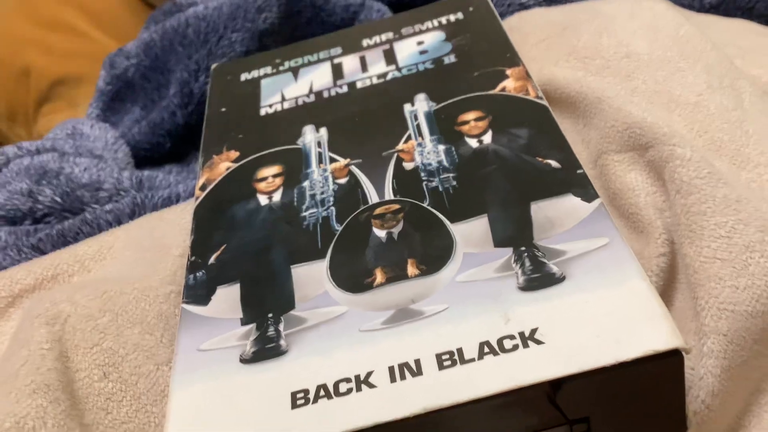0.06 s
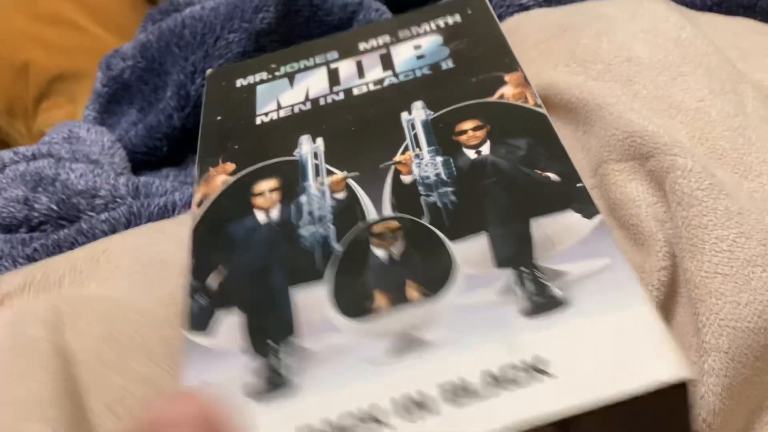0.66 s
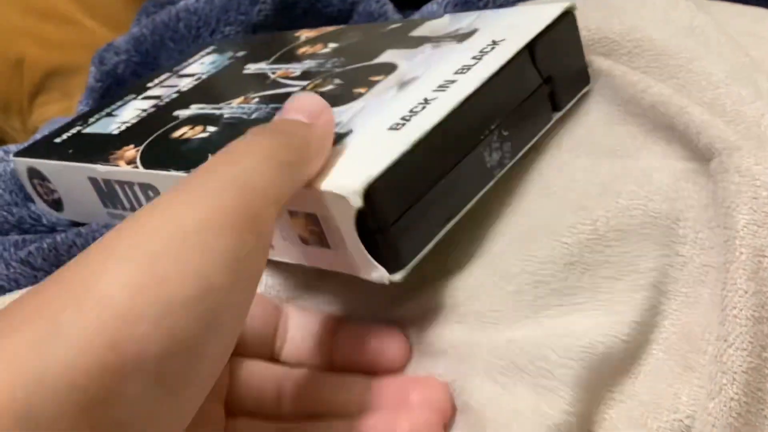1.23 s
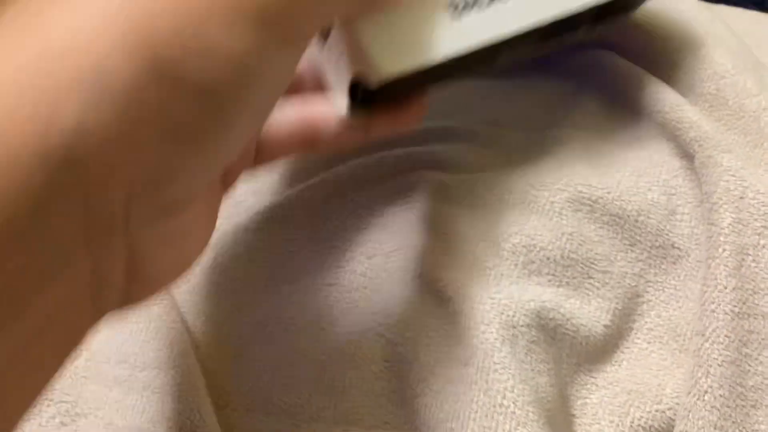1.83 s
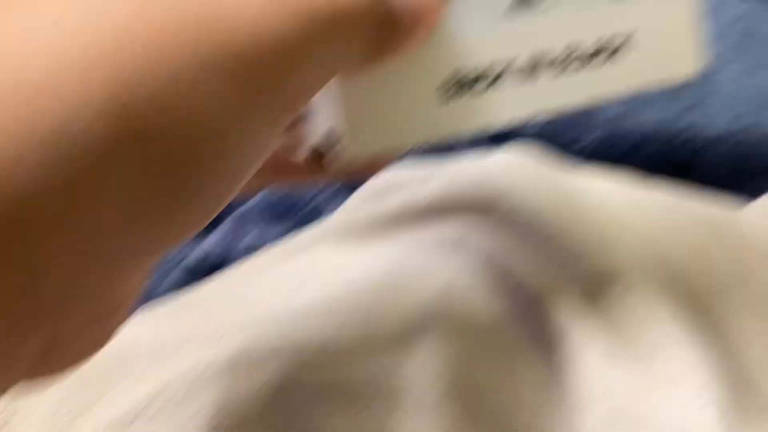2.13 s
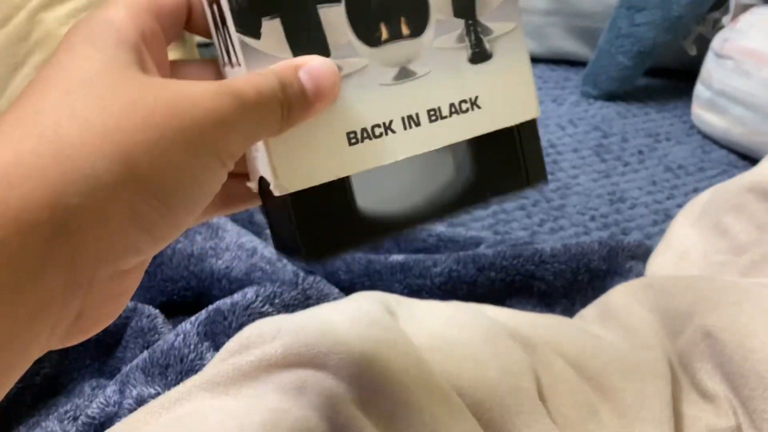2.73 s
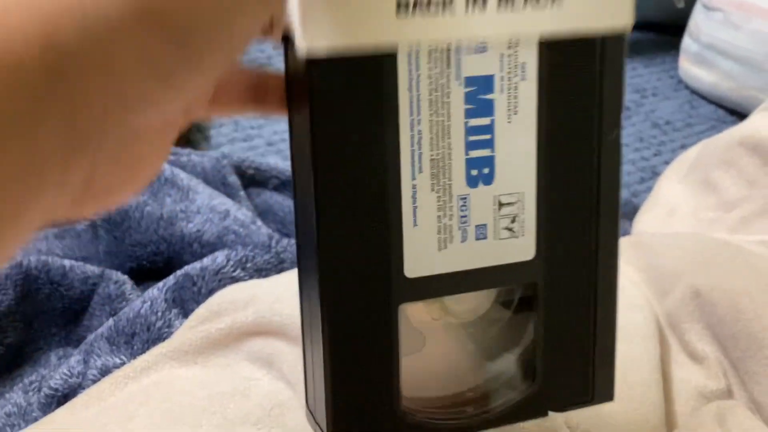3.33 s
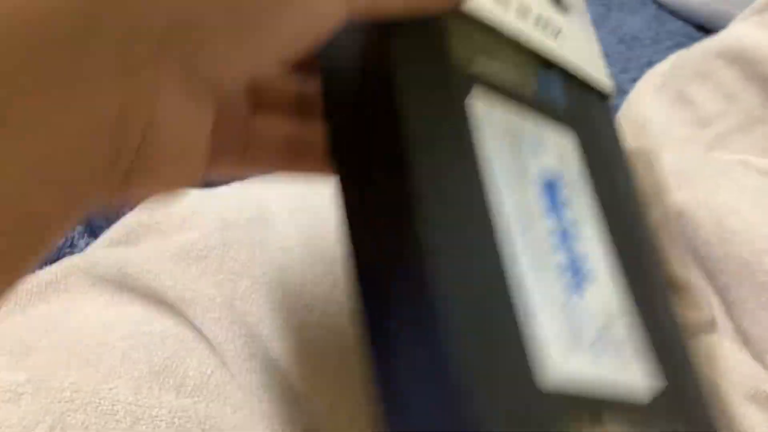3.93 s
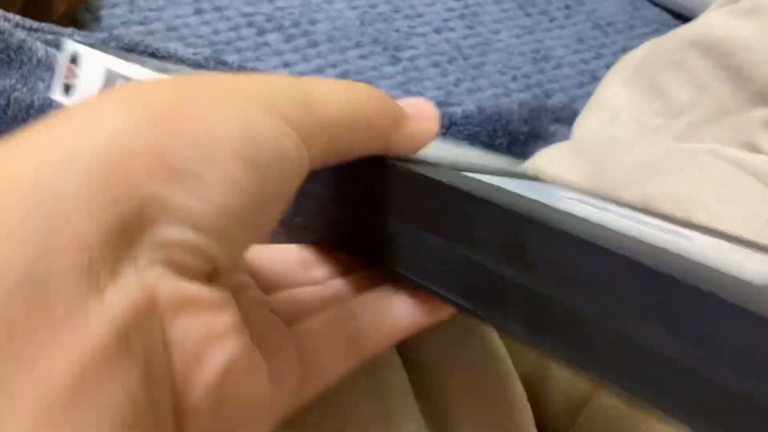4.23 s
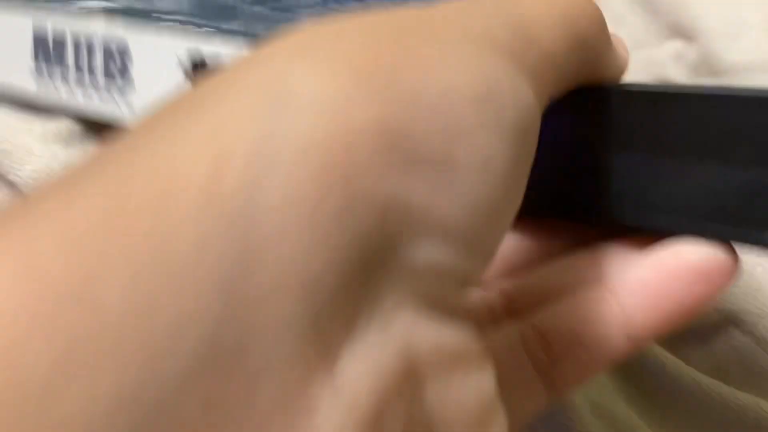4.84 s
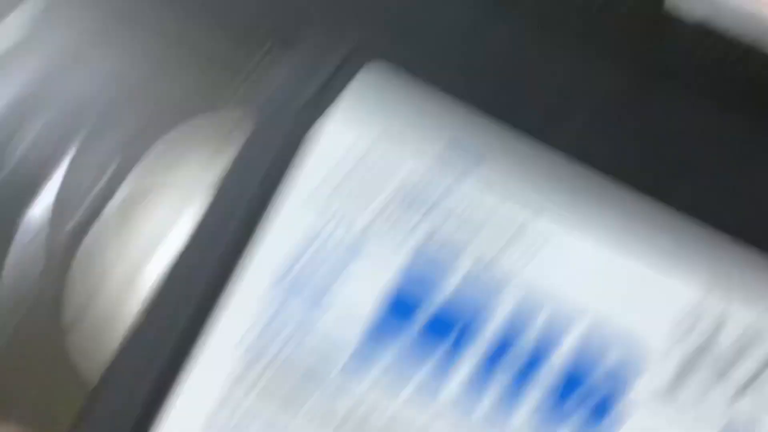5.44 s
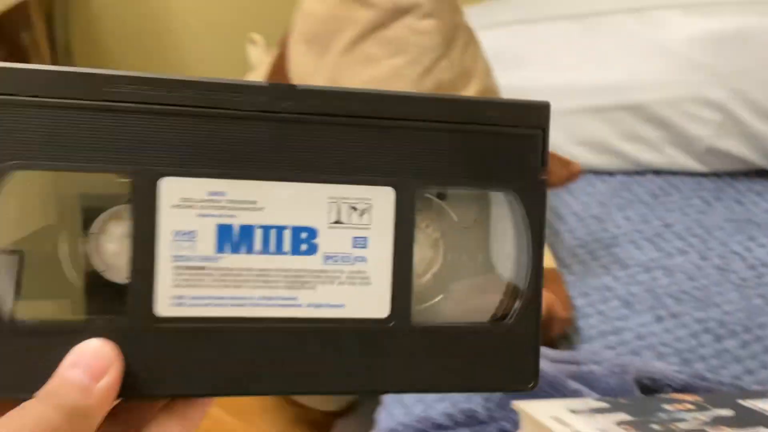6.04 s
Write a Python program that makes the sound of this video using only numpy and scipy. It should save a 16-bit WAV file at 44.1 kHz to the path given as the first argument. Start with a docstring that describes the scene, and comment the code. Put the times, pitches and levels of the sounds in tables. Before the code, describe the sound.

After a few close handling clicks, a plastic video cassette slides from a cardboard sleeve in two scrapes, then clatters and rattles lightly.

```python
"""Video cassette out of its sleeve

Fingers settle on a recorder, rubbing and knocking its case. In a small bedroom, a video cassette is
lifted off a blanket and slides out of its cardboard sleeve in two long stick-slip scrapes.
Its hollow plastic shell and loose reels clack as a hand catches it and turns it over."""
import sys
import numpy as np
from scipy import signal
from scipy.fft import rfft, irfft, next_fast_len
from scipy.io import wavfile
from scipy.ndimage import uniform_filter1d, map_coordinates

SR = 44100
rng = np.random.default_rng(int(sys.argv[2]) if len(sys.argv) > 2 else 0)


def to_wav(s):
    """Save 16-bit WAV."""
    ch = np.atleast_2d(s).T  # columns
    pcm = np.round(np.clip(ch, -1, 1) * 32767)  # PCM
    wavfile.write(sys.argv[1], SR, pcm.astype(np.int16))


N = 268128


def amp(db):
    """Decibels to gain."""
    return 10 ** (np.asarray(db) / 20)


def unit(x):
    """x at rms 1."""
    return x / np.sqrt(np.mean(x ** 2) + 1e-20)


def along(points, hz):
    """(Hz, value) points read on a log axis."""
    point_hz, values = np.transpose(points)
    return np.interp(np.log(hz + 1), np.log(point_hz + 1), values)


def add(track, start_s, sound):
    """Mix a sound into the track."""
    part = track[max(round(start_s * SR), 0):][:len(sound)]
    part += sound[:len(part)]


def wobble(rate_hz):
    """Smooth random curve through rate_hz knots a second."""
    knots = rng.standard_normal(int(N * rate_hz / SR) + 4)
    return map_coordinates(knots, [np.arange(N) * rate_hz / SR])


def colour(x, db_of_hz):
    """Minimum-phase filter with the given dB response."""
    size = 2 * next_fast_len(len(x) // 2 + 2048)
    gain = amp(db_of_hz(np.fft.rfftfreq(size, 1 / SR)))
    cepstrum = irfft(np.log(np.maximum(gain, 1e-6)), size)
    cepstrum[1:size // 2] *= 2
    cepstrum[size // 2 + 1:] = 0
    return irfft(rfft(x, size) * np.exp(rfft(cepstrum)), size)[:len(x)]


def friction(db_of_hz, slips_per_s, spread_db, judder_db, judder_hz):
    """Tiny random slips under uneven pressure, heard through a body; rms 1."""
    slipping = rng.random(N) < slips_per_s / SR
    slips = slipping * rng.standard_normal(N) * amp(spread_db * rng.standard_normal(N))
    force = unit(slips) + .5 * rng.standard_normal(N)
    pressure = amp(judder_db * wobble(judder_hz))
    return unit(colour(force * pressure, db_of_hz))


def strokes(rows, rise_s, fall_s):
    """Swell, hold and decay for rows of (start s, length s, dB, ..); one gain curve per dB column."""
    t, power = np.arange(N) / SR, np.zeros((len(rows[0]) - 2, N))
    for start, length, *levels_db in rows:
        span = slice(*np.searchsorted(t, [start - 10 * rise_s, start + length + 10 * fall_s]))
        before = np.maximum(start - t[span], 0)
        after = np.maximum(t[span] - start - length, 0)
        shape = np.exp(-before / rise_s - after / fall_s)
        power[:, span] += (amp(levels_db)[:, None] * shape) ** 2
    return np.sqrt(power)


def resonance(hz, width_hz):
    """Narrow friction-fed resonance at a steady or moving pitch; rms 1."""
    phase = 2 * np.pi * np.cumsum(hz * np.ones(N)) / SR
    return unit(wobble(width_hz) * np.cos(phase) + wobble(width_hz) * np.sin(phase))


def shifting(x, patchy_db):
    """As the grip changes, the tones the body favours come and go; rms 1."""
    spectrum = signal.stft(x, nperseg=1024)[2]
    patches = uniform_filter1d(rng.standard_normal(spectrum.shape), size=4, axis=0)
    patches = uniform_filter1d(patches, size=4, axis=1)
    return unit(signal.istft(spectrum * amp(patchy_db * unit(patches)), nperseg=1024)[1][:N])


# Finger drags on the case. Each row: start in s, length in s, then rub, hiss and fizz in dB.
CASE_DRAGS = [(.012, .04, -44.5, -47.5, -66.5), (.058, .025, -45.5, -47.5, -73),
              (.09, 0.083, -38, -51, -78.5), (.178, 0.018, -50.5, -52.5, -66), (.2, 0.055, -56, -58.5, -76),
              (.262, .045, -48.5, -56, -78), (.343, .03, -43.5, -45.5, -51), (.39, 0.049, -52.5, -54, -55),
              (.448, 0.067, -50.5, -49.5, -49.5)]
# Spectra of rub, hiss, and skin or fibre fizz. Each row: frequency in Hz, relative level in dB.
CASE_RUB = [(50, -31), (130, 1), (400, 1.5), (900, -4), (1500, -11.5), (2500, -22.5), (5000, -60.5)]
CASE_HISS = [(700, -27.5), (1500, -2.5), (2700, 2.5), (3600, -4.5), (5300, -11), (7200, -4.5),
             (9500, -18.5), (14000, -33)]
FIZZ = [(2000, -16.5), (4500, -5.5), (6100, 0), (6400, -1.5), (12000, -2), (16000, -11)]
# Path of the skin's squeak. Each row: time in s, pitch in Hz, level in dB.
SQUEAK = [(.36, 2900, -62.5), (.39, 3295, -51.5), (.42, 3780, -51.5), (.45, 3745, -59), (.48, 2676, -56.5),
          (.515, 2050, -55), (.535, 1945, -65)]


def grip():
    """Skin drags over the recorder's case and squeaks as it lets go."""
    rub, hiss, fizz = strokes(CASE_DRAGS, rise_s=.005, fall_s=.0076)
    low = friction(lambda hz: along(CASE_RUB, hz), 1500, 1.1, judder_db=.61, judder_hz=50)
    mid = friction(lambda hz: along(CASE_HISS, hz), 9000, 1.7, judder_db=2.3, judder_hz=60)
    high = friction(lambda hz: along(FIZZ, hz), 9700, 2, judder_db=.92, judder_hz=47)
    times, pitch_hz, db = np.transpose(SQUEAK)
    t = np.arange(N) / SR
    squeak_gain = amp(np.interp(t, times, db)) * (t > times[0]) * (t < times[-1])
    squeak = resonance(np.interp(t, times, pitch_hz), width_hz=650)
    return rub * low + hiss * mid + fizz * high + squeak_gain * squeak


# Knocks on the case, later dull bumps of the box. Each row: start in s, peak in dB,
# strongest pitch in Hz, cycles per e-fold fall of pitch.
KNOCKS = [(0.0272, -24.5, 283, 2.4), (.163, -12.5, 1244, 2.1), (0.179, -24.5, 284, 2.4),
          (0.3154, -16, 296, 1.8), (0.3426, -26, 605, 2), (0.3526, -27.5, 220.8, 2.06),
          (.370, -36, 204, 1.5), (.412, -39, 255, 2.2), (0.438, -22.5, 181, 1.43), (0.458, -31, 199.7, 1.9),
          (0.648, -52.5, 220, 2.2), (1.932, -42, 263, 3.7), (2.0397, -35.5, 620, 2.22),
          (2.115, -47, 550, 0.98)]


def knocks(start_hz=2100, low_cut_hz=100, focus=1.9):
    """Knocks travel through the case treble first: each is a fast falling chirp."""
    out, t = np.zeros(N), np.arange(SR // 10) / SR
    for start, db, centre_hz, cycles in KNOCKS:
        hz = 1 / (1 / start_hz + t / cycles)
        turns = np.cumsum(hz) / SR
        band = (2 / (hz / centre_hz + centre_hz / hz)) ** focus
        envelope = band / np.sqrt(1 + (low_cut_hz / hz) ** 6)
        grit = .35 * map_coordinates(rng.standard_normal(100), [turns * 4])
        add(out, start, amp(db) * envelope * (np.sin(2 * np.pi * turns) + grit))
    return out


# Snaps of the case. Each row: start in s, peak in dB, pitch in Hz, treble cutoff in Hz.
SNAPS = [(0.1638, -16.5, 2430, 5070), (0.3163, -23.5, 2500, 4000), (0.3202, -8, 2596, 6010),
         (0.344, -30.5, 3500, 9000), (0.3547, -23.5, 2970, 9000), (.4401, -11, 6000, 9500),
         (0.4564, -20, 1950, 5010)]


def snaps(t60_s=.00083):
    """The case snaps right at the microphone: a few sharply damped cycles."""
    out, t = np.zeros(N), np.arange(SR // 10) / SR
    decay = np.exp(-np.log(1000) * t / t60_s)
    for start, db, pitch_hz, cutoff_hz in SNAPS:
        ring = np.cos(2 * np.pi * pitch_hz * t) + .066 * rng.standard_normal(len(t))
        snap = colour(ring * decay, lambda hz: -10 * np.log10(1 + (hz / cutoff_hz) ** 4))
        add(out, start, amp(db) * snap / np.abs(snap).max())
    return out


# Modes of the hollow shell. Each row: centre in Hz, width in Hz, weight on a log scale.
SHELL_MODES = [(966, 29, -4.5), (1093, 160, 5.5), (1450, 20, -24.5), (1710, 320, -1.5), (1986, 320, -17),
               (2597, 810, 7.5), (3340, 310, -0.5), (3900, 160, -16), (5930, 520, -6)]


def shell_db(hz, depth_db):
    """Lift from the shell's resonances, depth_db at the strongest."""
    lift = sum(amp(weight / 2) / (1 + (2 * (hz - centre) / width) ** 2)
               for centre, width, weight in SHELL_MODES)
    return depth_db * lift / (lift.max() + 1e-9)


# Single clacks of the shell. Each row: time in s, level in dB, extra treble in dB.
CLACKS = [(.686, -53.5, -18), (.71, -54, 6.5), (1.811, -62, -5.5), (1.93, -47.5, 9.5), (2.04, -35, 1.5),
          (3.534, -44, -6), (3.731, -40.5, -3), (3.773, -42.5, -10), (3.864, -46.5, -32),
          (4.066, -35.5, -1), (4.096, -42, 0), (4.149, -47, -8), (4.192, -43.5, 3), (4.236, -41.5, 9.5),
          (4.42, -32, 5.5), (4.712, -33, 5.5), (4.744, -22, 1.5), (4.809, -21, -3), (5.189, -59, 2),
          (5.431, -52.5, 1), (5.714, -61.5, 14), (5.776, -46.5, 8), (5.874, -48.5, 18), (5.93, -54.5, 9.5)]
# Rattles of the loose reels. Each row: first and last clack in s, rough gap in s,
# mid-rattle level in dB, extra treble in dB, drop at both ends in dB.
RATTLES = [(3.622, 3.703, .026, -34.5, 5.5, 5.5), (4.412, 4.497, .0215, -30.5, 0.5, 4.5),
           (4.776, 4.827, .017, -24.5, 7.5, -0.5)]
# Spectrum of the plastic. Each row: frequency in Hz, relative level in dB.
PLASTIC = [(71, -57), (120, -18.5), (580, -6.5), (630, -0.5), (949, -2), (1320, -5), (2480, -4.5),
           (3110, -9.5), (5300, -11.5), (6630, -24.5), (12300, -29.5), (16000, -42)]


def clacks(lead_s=.02, scuff_s=.0029, rise_s=.0018, heavy_db=-23.5):
    """A short scuff, then plastic chatters on plastic and rings the shell, singly or in even rattles."""
    contacts = list(CLACKS)
    for first, last, gap, db, treble_db, drop_db in RATTLES:
        for u in np.linspace(0, 1, round((last - first) / gap) + 1):
            contacts.append((first + u * (last - first), db - drop_db * (2 * u - 1) ** 2, treble_db))
    out, t = np.zeros(N), np.arange(SR // 6) / SR - lead_s
    after, onset = np.maximum(t, 0), round(lead_s * SR)
    attack = 1 - np.exp(-after / rise_s)
    fade = lambda t60_s: np.exp(-np.log(1000) * after / t60_s)
    for time, db, treble_db in contacts:
        chatter = amp(1.5 * map_coordinates(rng.standard_normal(200), [(t + lead_s) * 900]))
        blow = attack * (chatter * fade(t60_s=.024) + amp(-17) * fade(t60_s=.057))
        # light taps land cleanly, heavy ones skid in
        scuff = amp(-14 + min(db - heavy_db, 0)) * chatter * np.exp(-np.abs(t) / scuff_s)
        force = rng.standard_normal(len(t)) * (blow + scuff)
        hardness = [(3500, .01), (9000, treble_db)]
        # each spot on the shell favours other tones
        spot = np.transpose([np.geomspace(400, 8000, 30), rng.normal(0, 2.5, 30)])
        clack = colour(force, lambda hz: along(PLASTIC, hz) + along(hardness, hz)
                       + along(spot, hz) + shell_db(hz, depth_db=7))
        onset_rms = np.std(clack[onset:][:SR // 150])
        add(out, time - lead_s, amp(db) * clack / onset_rms)
    return out


# Shifts of the hold. Each row: start in s, length in s, then rumble, rub and skin hiss in dB.
HOLD_SHIFTS = [(.69, .025, -60.5, -62, -71), (0.79, .015, -75, -60, -65.5), (0.964, 0.021, -62.5, -68, -92),
               (1.178, 0.012, -77, -63, -67.5), (1.928, 0.007, -53, -67, -79),
               (1.981, 0.046, -61, -60, -58), (3, 0.033, -60.5, -58, -73), (3.517, 0.046, -61, -60, -76),
               (3.646, 0.048, -44.5, -36, -51.5), (3.739, .04, -56, -49, -60),
               (3.815, 0.093, -68.5, -55, -70.5), (4.07, 0.031, -62, -48, -58),
               (4.16, .04, -49, -45.5, -57.5), (4.237, .025, -51, -47.5, -79),
               (4.404, 0.065, -55, -45, -61.5), (4.52, 0.03, -50.5, -56.5, -68),
               (4.687, 0.027, -76, -47, -57.5), (4.729, 0.12, -47.5, -41, -49),
               (4.879, .05, -59.5, -45, -54.5), (4.986, 0.0216, -60, -43, -55),
               (5.055, 0.028, -67.5, -76.5, -78.5), (5.217, 0.089, -81, -71, -76.5),
               (5.336, 0.095, -75, -60.5, -64), (5.497, .02, -72, -65, -97), (5.6, 0.052, -71, -59.5, -111),
               (5.79, 0.16, -93, -67, -73)]
# Spectra of the rumble and of a finger driving the shell. Each row: frequency in Hz, relative dB.
RUMBLE = [(25, -26), (45, -23), (70, 5.5), (130, -4), (280, 0), (500, -10), (1200, -47.5)]
SKIN = [(500, 3), (1100, 2.5), (2200, -0.5), (4500, 0.5), (8000, -0.5)]


def handling(rise_s=.013, bass_lag_s=.014):
    """Fingers shift on the box: a rub that sounds the shell, a brush of skin, a trailing rumble."""
    start, length, rumble_db, rub_db, hiss_db = np.transpose(HOLD_SHIFTS)
    rumble, = strokes(np.c_[start + bass_lag_s, length, rumble_db], rise_s, fall_s=.029)
    rub, = strokes(np.c_[start, length, rub_db], rise_s, fall_s=.024)
    hiss, = strokes(np.c_[start, length, hiss_db], rise_s, fall_s=.018)
    dull = friction(lambda hz: along(RUMBLE, hz), 600, 1.8, judder_db=1.5, judder_hz=21)
    shell = friction(lambda hz: along(PLASTIC, hz) + along(SKIN, hz) + shell_db(hz, depth_db=4),
                     5000, 2, judder_db=2.7, judder_hz=110)
    brush = friction(lambda hz: along(FIZZ, hz), 6600, 1.8, judder_db=1.5, judder_hz=60)
    return rumble * dull + rub * shifting(shell, patchy_db=3.5) + hiss * brush


# Drags over the blanket. Each row: start in s, length in s, rustle in dB, fibre hiss in dB.
SWISHES = [(.76, 0.14, -77.5, -68.5), (1.13, 0.063, -79, -76), (1.43, 0.19, -61.5, -73.5),
           (2.09, 0.012, -77, -65)]
# Spectrum of the pile. Each row: frequency in Hz, relative level in dB.
PILE = [(240, -19.5), (420, -2.5), (800, -7.5), (1600, -6), (2700, -5), (3600, -7), (4700, -3.5),
        (6000, -2.5), (6600, -13), (13000, -16.5), (16000, -21.5)]


def blanket():
    """The box slides over the blanket: the pile rustles and fine fibres hiss."""
    rustle, hiss = strokes(SWISHES, rise_s=.078, fall_s=.053)
    pile = friction(lambda hz: along(PILE, hz), 6400, 1.5, judder_db=1.4, judder_hz=33)
    fibres = friction(lambda hz: along(FIZZ, hz), 9000, 1.5, judder_db=1.2, judder_hz=72)
    return rustle * pile + hiss * fibres


# Pushes out of the sleeve. Each row: start, stop, speed-up, slow-down and surge time in s,
# speed surge in dB, then base levels of scrape, edge hiss and rasp in dB.
PUSHES = [(2.539, 3.141, 0.19, 0.17, 2.74, 1, -43.5, -44, -47),
          (3.086, 3.579, 0.2, 0.13, 3.31, 3, -42.5, -46, -45)]
# Spectra of the sleeve and the bared shell. Each row: frequency in Hz, relative level in dB.
CARDBOARD = [(60, -34), (250, -19), (400, -16), (600, -9), (850, -9), (1150, -7.5), (1600, -6.5),
             (2400, -4.5), (3900, -10), (5200, -6.5), (6100, -9.5), (6350, -14), (12000, -12),
             (16000, -26.5)]
BARE_SHELL = [(100, -17), (350, -9), (620, 7.5), (800, 3), (1150, 5.5), (3000, -9), (6000, -44.5)]


def slide(split_hz=3800, wall_hz=2396, surge_s=.045, hiss_wane_db_per_s=5, rasp_wane_db_per_s=20):
    """The shell sticks and slips along cardboard; speed brings out edge hiss and the wall's rasp."""
    t = np.arange(N) / SR
    ease = lambda u: np.sin(np.pi / 2 * np.clip(u, 0, 1)) ** 2
    scrape, hiss, rasp = np.zeros((3, N))
    for start, stop, rise_s, fall_s, surge_at, surge_db, scrape_db, hiss_db, rasp_db in PUSHES:
        run = ease((t - start) / rise_s) * ease((stop - t) / fall_s)
        speed = run * amp(surge_db * np.exp(-((t - surge_at) / surge_s) ** 2))
        scrape += amp(scrape_db) * run
        hiss += amp(hiss_db - hiss_wane_db_per_s * (t - start)) * speed ** 1.3
        rasp += amp(rasp_db - rasp_wane_db_per_s * (t - start)) * speed ** 2.3
    lows = lambda hz: along(CARDBOARD, hz) - 10 * np.log10(1 + (hz / split_hz) ** 8)
    highs = lambda hz: along(CARDBOARD, hz) - 10 * np.log10(1 + (split_hz / (hz + 1)) ** 8)
    sleeve = friction(lambda hz: lows(hz) + shell_db(hz, depth_db=2),
                      5000, 1.6, judder_db=.22, judder_hz=76)
    shell = friction(lambda hz: along(BARE_SHELL, hz) + shell_db(hz, depth_db=7),
                     4000, 1.4, judder_db=1.2, judder_hz=64)
    edge = friction(highs, 9000, 1.3, judder_db=.98, judder_hz=76)
    # the further the cassette sticks out, the more its shell is heard
    bared = np.interp(t, [2.95, 3.5], [0, .7])
    body = np.sqrt(1 - bared) * sleeve + amp(-1) * np.sqrt(bared) * shell
    return scrape * shifting(body, patchy_db=2.5) + hiss * edge + rasp * resonance(wall_hz, width_hz=560)


# Tilts of the cassette. Each row: start in s, length in s, level in dB.
TILTS = [(4.63, 0.099, -55.5), (5.21, 0.71, -68.5)]
# Spectrum of the reels' rub. Each row: frequency in Hz, relative level in dB.
REEL_RUB = [(290, -36.5), (500, -5), (1240, -10), (1360, -8.5), (1810, 1), (3090, -16), (5030, -13.5),
            (7210, -43.5), (8000, -32.5), (10400, -63), (17600, -120)]


def reels():
    """The tape reels turn and rub unevenly inside the tilted shell."""
    level, = strokes(TILTS, rise_s=.044, fall_s=.046)
    return level * friction(lambda hz: along(REEL_RUB, hz), 1700, 2.7, judder_db=3.4, judder_hz=40)


# Bedroom decay. Each row: frequency in Hz, T60 in s.
BEDROOM_T60 = [(200, 0.25), (1500, 0.19), (5000, 0.083), (14000, 0.1)]


def room(x, wet_db, delay_s=.0048):
    """x plus the short reverberation of a small furnished room."""
    hz, t, noise = signal.stft(rng.standard_normal(SR // 2), SR, nperseg=256)
    decay = amp(-60 * t / along(BEDROOM_T60, hz)[:, None])
    tail = signal.istft(noise * decay, SR, nperseg=256)[1]
    tail = np.pad(tail / np.linalg.norm(tail), (round(delay_s * SR), 0))
    return x + amp(wet_db) * signal.fftconvolve(x, tail)[:N]


# Spectrum of the quiet room. Each row: frequency in Hz, relative level in dB.
ROOM_TONE = [(25, -41.5), (45, -16.5), (114, -10), (150, -12.5), (575, -15.5), (1400, -23.5), (2400, -27.5),
             (16000, -36.5)]


def scene():
    """The cassette at arm's length, dry finger sounds on the recorder, and room tone; mono."""
    quiet = amp(-74.5) * unit(colour(rng.standard_normal(N), lambda hz: along(ROOM_TONE, hz)))
    rubbing = slide() + blanket() + handling() + reels()
    cassette = room(clacks(), wet_db=-8.5) + room(rubbing, wet_db=-17)
    close = knocks() + snaps() + grip()
    return (cassette + close + quiet)[None]


def record(dry, low_hz=50, top_hz=16000):
    """The microphone sheds the deepest bass and keeps nothing above top_hz."""
    size = next_fast_len(N + SR // 2)
    hz = np.fft.rfftfreq(size, 1 / SR)
    response = (hz < top_hz) / np.sqrt(1 + (low_hz / (hz + 1)) ** 8)
    return irfft(rfft(dry, size) * response, size)[:, :N]


dry = scene()
out = record(dry)
to_wav(out)
```